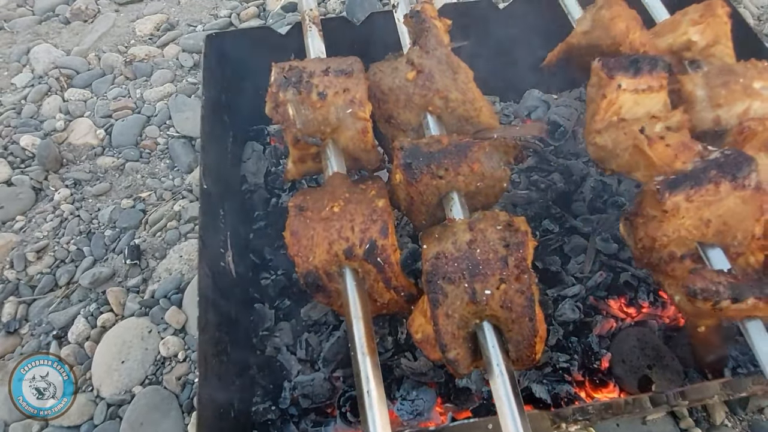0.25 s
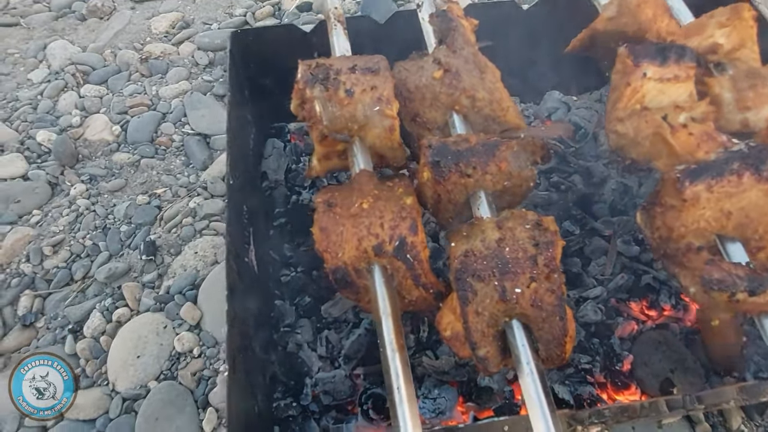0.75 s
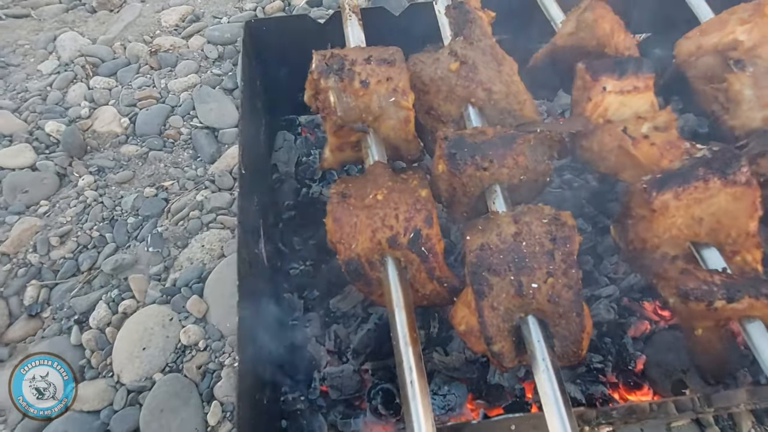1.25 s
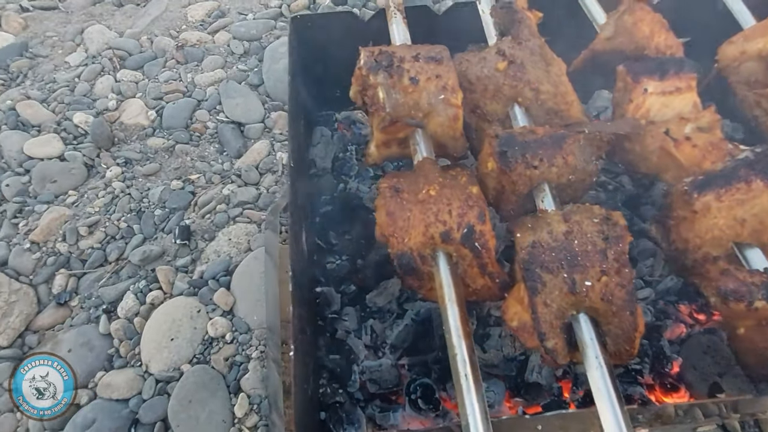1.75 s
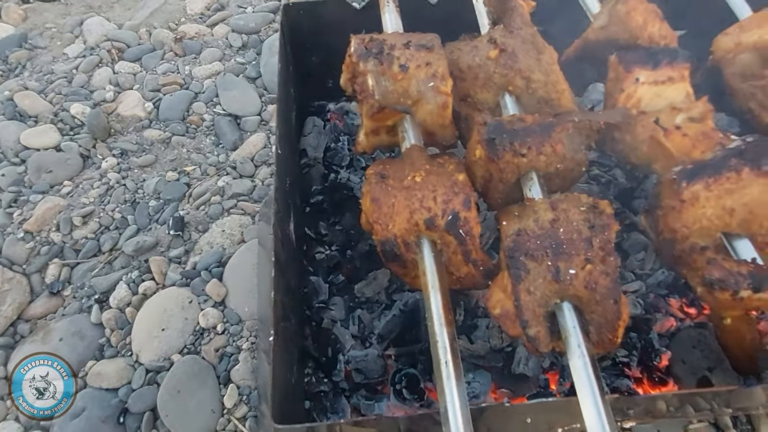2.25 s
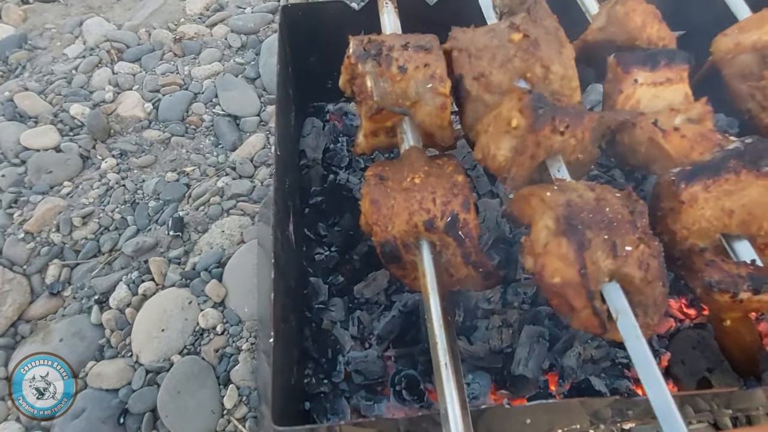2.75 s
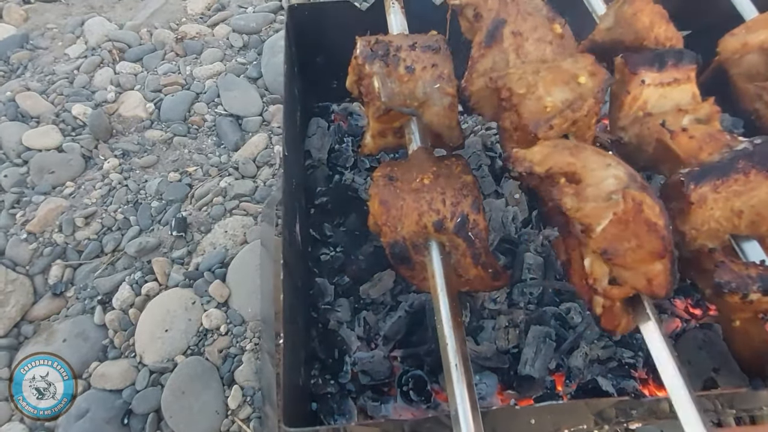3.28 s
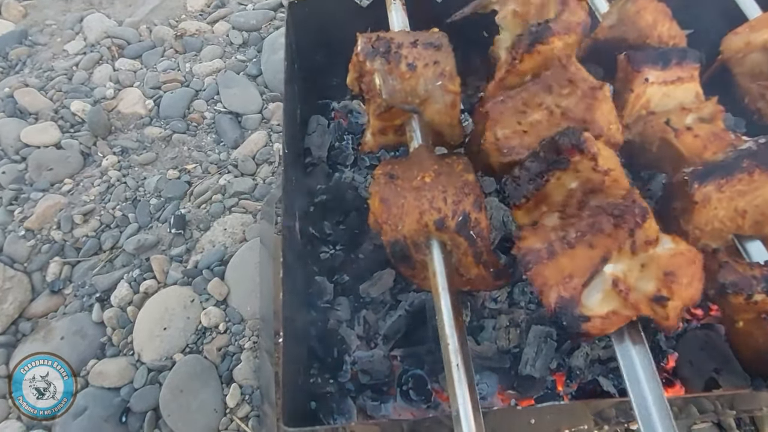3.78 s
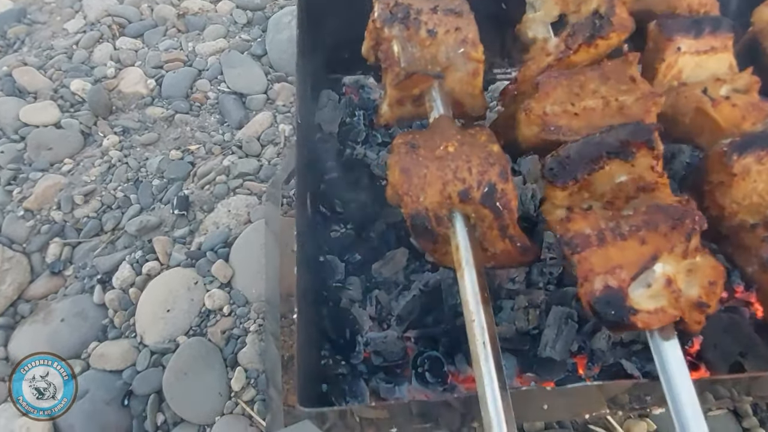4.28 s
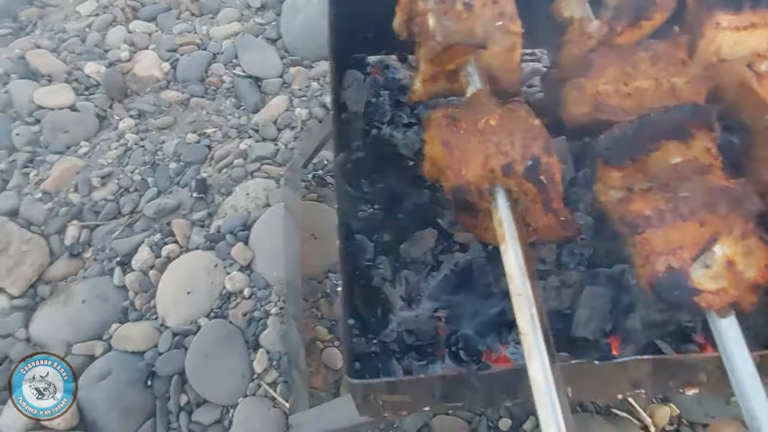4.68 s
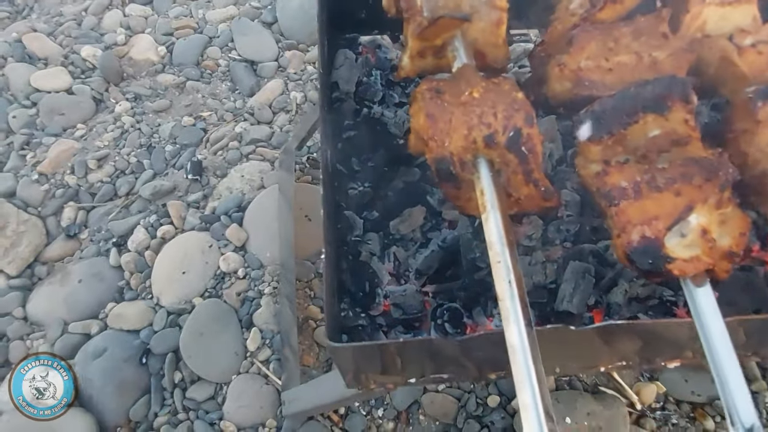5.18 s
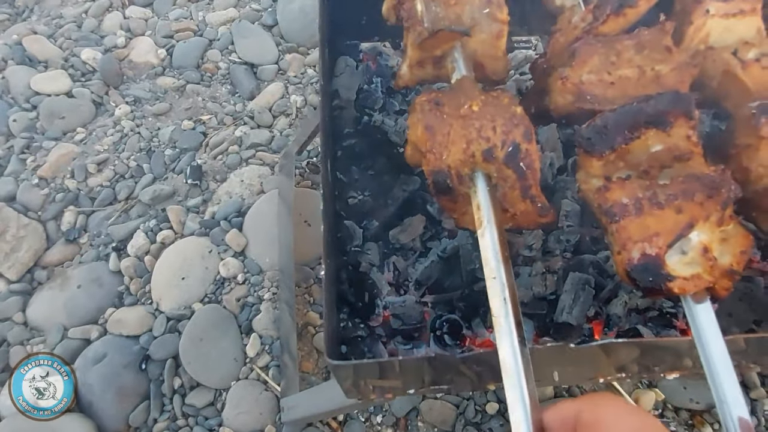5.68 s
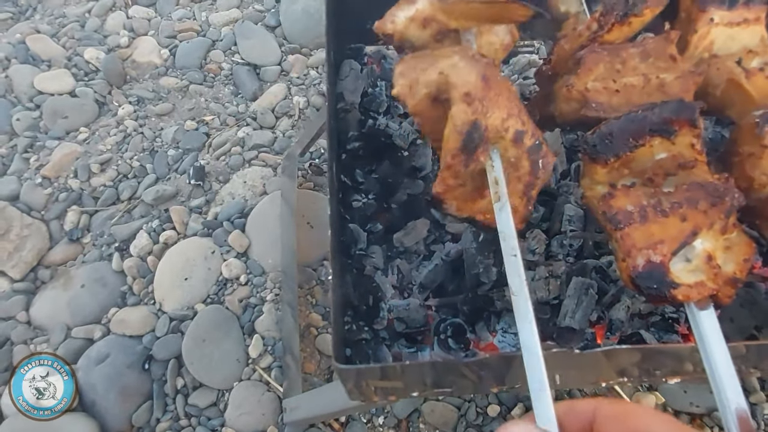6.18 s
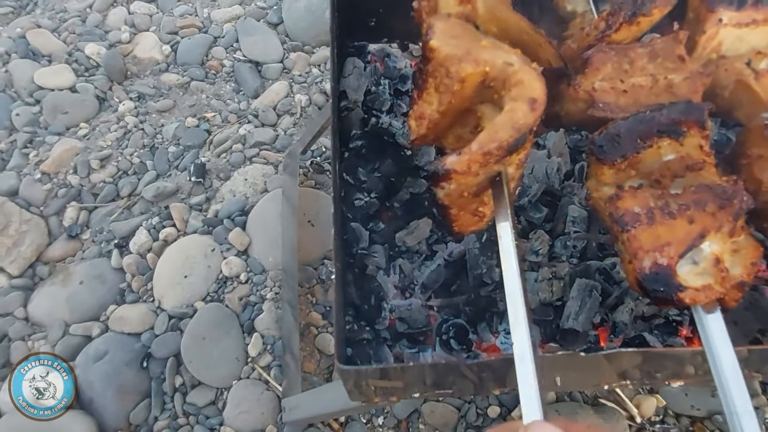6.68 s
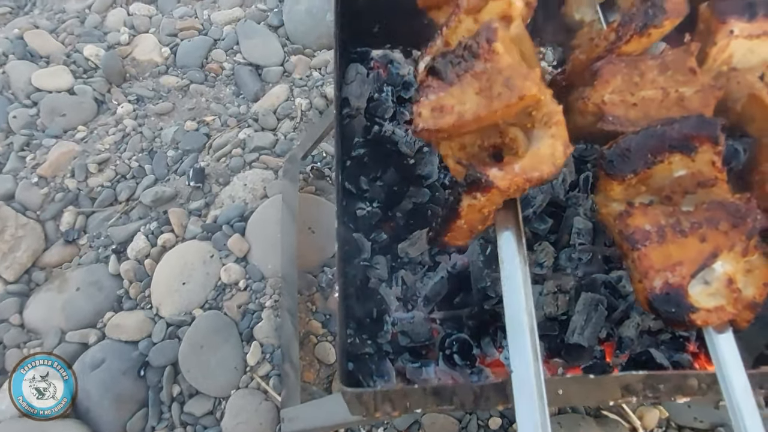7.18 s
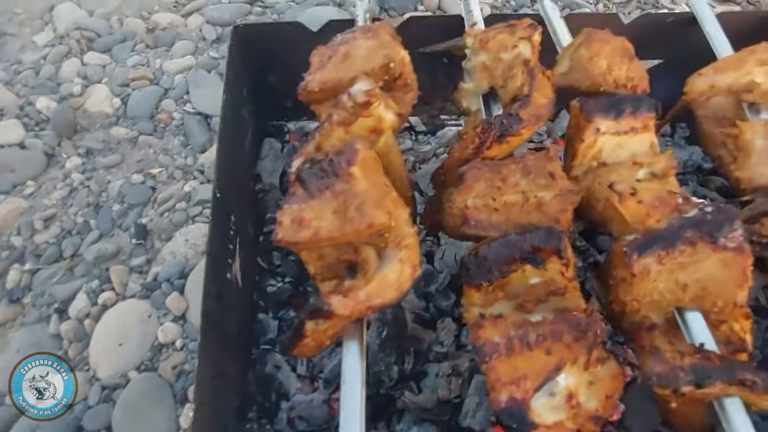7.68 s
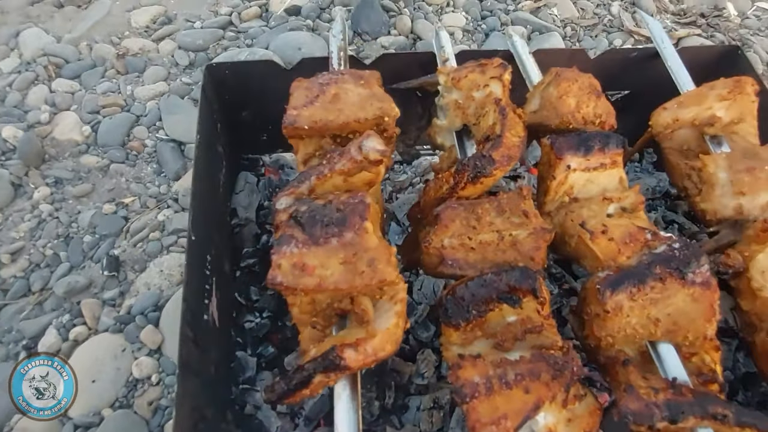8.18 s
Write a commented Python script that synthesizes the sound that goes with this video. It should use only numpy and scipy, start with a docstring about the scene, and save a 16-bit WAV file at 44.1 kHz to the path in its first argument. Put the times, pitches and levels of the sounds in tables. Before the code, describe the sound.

Skewered fish sizzles finely over charcoal with sharp snaps and spits, a steel skewer clacks into place, and a brief boiling hiss flares late.

```python
"""A pebble riverbank: skewered fish sizzles over charcoal in a sheet-steel trough, close to a hand-held phone.
The sizzle is thousands of tiny clicks, busier when the fat flares up; late on, one drop boils off in a hiss.
Each coal snap is one click through resonances; the skewer squeaks and rubs as filtered noise, then drops
into its notch and rings as a sum of dying sine tones. Handling bumps are short low noise.
Hot air, breeze on the microphone and the far river are noises with their own spectra and random wavering."""
import sys
import numpy as np
from scipy import signal
from scipy.fft import rfft, irfft, next_fast_len
from scipy.io import wavfile
from scipy.ndimage import uniform_filter1d

SR = 44100
rng = np.random.default_rng(int(sys.argv[2]) if len(sys.argv) > 2 else 0)


def transcribe(signal):
    """Save signal, clipped to [-1, 1], as a 16-bit WAV file at the path in sys.argv[1]."""
    frames = np.atleast_2d(signal).T
    limited = np.clip(frames, -1, 1)
    pcm = np.round(limited * 32767).astype(np.int16)
    wavfile.write(sys.argv[1], SR, pcm)


N = 372644  # length in samples
TOP_HZ = 15950  # nothing much is heard above this


def undb(db):
    """Turn decibels into a gain."""
    return 10 ** (np.asarray(db) / 20)


def unit(x):
    """Scale to an rms (average strength) of one."""
    return x / np.sqrt(np.mean(x ** 2))


def during(start, end, fade=0.012):
    """A window in time, in seconds, with soft edges."""
    t = np.arange(N) / SR
    return np.clip(np.minimum(t - start, end - t) / fade, 0, 1)


def colour(x, spectrum):
    """Shape a sound by a spectrum of (Hz, dB) points, then scale it to an rms of one."""
    hz, db = np.transpose(spectrum)
    size = next_fast_len(N)
    f = np.maximum(np.fft.rfftfreq(size, 1 / SR), 1)
    # below the first point the sound falls away
    below = np.minimum(f / hz[0], 1) ** 2
    gain = undb(np.interp(np.log(f), np.log(hz), db)) * below * (f < TOP_HZ)
    return unit(irfft(rfft(x, size) * gain, size)[..., :N])


def band(x, hz, width):
    """A resonance, width in Hz, with a gain of one at its centre."""
    hz = min(hz, TOP_HZ)
    quality = hz / min(width, TOP_HZ)
    return signal.lfilter(*signal.iirpeak(hz, quality, fs=SR), x)


def above(x, hz, order=2):
    """Keep what lies above a pitch (high-pass)."""
    return signal.sosfilt(signal.butter(order, min(hz, TOP_HZ), "high", fs=SR, output="sos"), x)


def sides(pan_db):
    """Left and right gains of constant power, from left minus right in dB."""
    gains = undb(np.array([pan_db, -pan_db]) / 2).reshape(2, -1)
    return gains / np.sqrt(np.mean(gains ** 2, axis=0))


def ports(x, lag_s):
    """One microphone port hears a near sound later; a positive lag means that the left one is late."""
    lag = round(lag_s * SR)
    left = np.roll(x[0], max(lag, 0))
    right = np.roll(x[1], max(-lag, 0))
    return np.array([left, right])


def noise(likeness, size=N):
    """Left and right noise: likeness 1 is the same on both sides, 0 is unrelated."""
    c = np.clip(likeness, -1, 1)
    mid, side = rng.standard_normal((2, size)) * np.sqrt([[(1 + c) / 2], [(1 - c) / 2]])
    return np.array([mid + side, mid - side])


def walk(rate):
    """Slow chance: random levels, each held 1 / rate seconds, smoothed twice to an rms of one."""
    hold = int(SR / rate)
    steps = np.repeat(rng.standard_normal(N // hold + 1), hold)[:N]
    return unit(uniform_filter1d(uniform_filter1d(steps, hold), hold))


def swells(rows, rise_s, fall_s):
    """Summed power of (start s, length s, dB) swells that rise, hold and die away; a fourth column pans each."""
    t = np.arange(N) / SR
    coarse = t[::64]  # slow shapes need few points
    power = 0
    for start, length, db, *pan in rows:
        rise = np.clip((coarse - start) / rise_s, 0, 1)
        fall = np.exp(-np.clip((coarse - start - length) / fall_s, 0, 20))
        power = power + (undb(db) * rise * fall * sides(pan[0] if pan else 0)) ** 2
    return np.array([np.interp(t, coarse, p) for p in power])


def add(out, s, sound):
    """Mix a short sound in at a time in seconds."""
    i = int(s * SR)
    out[:, i:i + sound.shape[1]] += sound[:, :N - i]


def peak(x, db):
    """Set the level of the loudest millisecond."""
    power = uniform_filter1d(np.mean(x ** 2, axis=0), size=44)
    return x * undb(db) / np.sqrt(power.max())


def crack(scatter_db, scatter_s, tail_db, tail_s):
    """One sharp click, its scatter among the coals, and a faint tail from trough and pebbles."""
    t = np.arange(SR // 8) / SR
    scatter = undb(scatter_db) * np.exp(-t / scatter_s)
    tail = undb(tail_db) * np.exp(-t / tail_s)
    click = (scatter + tail) * noise(0.13, size=len(t))
    click[:, 0] += 1
    return click


def bubbles(rate, spread_db, width_db, count=6):
    """Bubbles burst at a rate per second in several spots: very many small ones and a few large."""
    out = np.zeros((2, N))
    # bubbles come in flurries
    busy = undb(2.2 * walk(12))
    for place in np.linspace(-1, 1, count):
        at = np.flatnonzero(rng.random(N) < busy * rate / count / SR)
        size = undb(spread_db * np.minimum(rng.exponential(size=len(at)), 5))
        train = np.zeros((1, N))
        train[0, at] = size * rng.choice([-1, 1], len(at))
        # every burst in a spot sounds through the same path to the two ports
        burst = crack(scatter_db=-11.5, scatter_s=0.0013, tail_db=-25.0, tail_s=0.011)
        path = ports(burst, .00022 * place) * sides(-width_db * place)
        out += signal.oaconvolve(train, path, axes=1)[:, :N]
    return unit(out)


def sizzle():
    """Fat fries on the fish: bursting bubbles make a fine fizz and separate ticks; embers crackle lower."""
    # The spectrum of the frying fat. Each row: pitch in Hz, relative level in dB.
    fat_spectrum = [(600, -33), (1200, -10.5), (2000, -10.5), (3200, -7), (4600, -4.5), (7000, -6.5),
                    (9500, -3.5), (12500, 2), (16000, -3.5)]
    # The fat flares up, most when a skewer is turned.
    # Each row: start in seconds, length in seconds, level in dB before mixing, left minus right in dB.
    flares = [(0, .18, -61, 1), (1.16, .09, -62, -12), (1.96, .1, -66, -8), (3.17, .73, -58, 5),
              (3.38, .53, -54, -1), (3.65, .25, -56, 0), (4.0, .55, -59, 2), (4.2, .13, -55.5, 3),
              (5.78, .17, -64, 3), (6.5, .15, -62, 13), (6.9, .08, -56.5, -6), (7.03, .13, -60.5, 6),
              (8.13, .08, -65, 12)]
    # The embers crackle harder for a while. Each row: start in seconds, length in seconds, level in dB.
    stirs = [(.35, 0.19, -66.5), (1.15, 0.083, -66), (1.7, 0.36, -63), (2.4, 0.27, -69),
             (3.17, 0.79, -58.5), (3.75, 0.53, -58.5), (5.25, 0.53, -67), (7.4, 0.53, -66),
             (8.08, .15, -65.5)]
    fry_db, fry_pan_db, ember_db = -61.5, 1.2, -73  # steady levels, before flares and stirs
    fry_power = (undb(fry_db) * sides(fry_pan_db)) ** 2 + swells(flares, rise_s=.05, fall_s=.13)
    ember_power = undb(ember_db) ** 2 + swells(stirs, rise_s=0.035, fall_s=0.11)
    level_db = 10 * np.log10(fry_power.mean(axis=0))
    # the hotter the fat, the more bubbles burst
    heat = undb(.7 * (level_db - level_db.mean()))
    fizz = colour(bubbles(2500 * heat, spread_db=3.0, width_db=6), fat_spectrum)
    fizz = fizz * undb(2.0 + 2.0 * walk(22))
    ticks = colour(bubbles(170, spread_db=5.0, width_db=1.5), fat_spectrum) * undb(-1.5)
    ember_spectrum = [(700, -18), (1300, -9), (1900, -3), (3000, -5.5), (4600, -8.0), (8000, -16.0)]
    embers = colour(bubbles(200, spread_db=3.0, width_db=-3.0), ember_spectrum)
    # more bubbles are already louder, so the fizz is evened out before its level is set
    frying = (fizz / np.sqrt(heat) + ticks) * np.sqrt(fry_power)
    return frying + embers * np.sqrt(ember_power)


def air():
    """Hot air flutters over the bed in puffs; the breeze buffets each port almost separately."""
    # The spectrum of the hot air. Each row: pitch in Hz, relative level in dB.
    hot_air_spectrum = [(100, -8), (200, -4), (310, 2.5), (450, -2.5), (650, -3.5), (850, -13),
                        (1200, -16.5), (2000, -16.5), (4000, -23.5)]
    # The low spectrum of wind on the microphone. Each row: pitch in Hz, relative level in dB.
    wind_spectrum = [(24, -28), (42, 0), (70, -0.5), (110, -4.5), (165, -17.5), (250, -28), (500, -38),
                     (1000, -66)]
    # Puffs of hot air over the coals.
    # Each row: start in seconds, length in seconds, level in dB before the flutter.
    puffs = [(0, 0.021, -58.5), (.23, 0.071, -58.5), (.41, 0.26, -66.5), (.89, 0.067, -66.5),
             (1.15, 0.12, -58.5), (1.35, .12, -57), (1.74, 0.33, -71), (2.24, 0.13, -67), (3.3, 0.62, -65),
             (3.93, 0.054, -60.5), (4.3, 0.11, -65.5), (4.58, 0.16, -63), (5.33, 0.35, -64.5),
             (6.43, .09, -70.5), (6.78, 0.12, -64.5), (7.45, 0.15, -66), (7.72, .19, -62.5),
             (8.08, 0.17, -60)]
    # Gusts on the microphone.
    # Each row: start in seconds, length in seconds, level in dB before wavering, left minus right in dB.
    gusts = [(.67, 0.35, -62.5, 15), (1.38, 0.27, -62.5, 7), (1.85, 0.37, -63.5, 7), (2.81, 0.063, -56, 20),
             (3.22, 1.15, -63.5, 17), (3.68, 0.41, -60, 19), (6.31, 0.065, -50, 24), (6.41, .11, -47, 28),
             (6.77, 0.089, -42, 30), (7.08, 0.061, -55, 21), (7.37, 0.12, -53, 22), (7.78, .11, -56, -6),
             (8.03, 0.025, -47, 27), (8.15, 0.12, -47.5, -19)]
    hot_air_db, breeze_db, breeze_pan_db = -73.5, -68, 8  # steady levels, before puffs and gusts
    draught = undb(hot_air_db) ** 2 + swells(puffs, rise_s=0.016, fall_s=0.055)
    breeze = (undb(breeze_db) * sides(breeze_pan_db)) ** 2
    buffet = breeze + swells(gusts, rise_s=0.013, fall_s=0.035)
    flutter = colour(noise(0.61), hot_air_spectrum) * np.sqrt(draught) * undb(0.5 + 2.7 * walk(30))
    wind = colour(noise(0.068), wind_spectrum) * np.sqrt(buffet) * undb(1.54 * walk(15))
    return flutter + wind


def river():
    """The smooth, distant rush of water: steady noise that wavers very little."""
    # The spectrum of the far water. Each row: pitch in Hz, relative level in dB.
    water_spectrum = [(24, -35), (40, -13), (87, -9), (133, 2), (194, -4), (290, -2.5), (630, -18),
                      (918, -15.5), (1370, -26.5), (1850, -6), (2260, -16), (4930, -12.5), (6820, -14),
                      (12500, -9.5), (16000, -14)]
    return colour(noise(0.072), water_spectrum) * undb(-63.0 + 0.72 * walk(3.12))


def snaps():
    """Coals split and fat spits, and the skewer knocks once; each crack has its own brightness and place."""
    # Snaps of coal and spitting fat; the row at 3.4988 s is a dull knock of the skewer on the trough. # Each
    # row: time in seconds, level in dB before a small lift, brightness in Hz (sets the filters), # level of the
    # low body against the bright part in dB, left minus right in dB before narrowing.
    cracks = [(0.1347, -44, 8800, -6, 2.5), (.1649, -43.5, 11300, -22, 9), (0.2367, -12, 8900, -29, -5.5),
              (0.2442, -34.5, 6950, -6, -3), (0.3014, -32, 7800, -14.5, -1.5), (.379, -39.5, 10890, -26, 6),
              (0.8736, -48.5, 2580, 4, 1), (0.896, -52, 4000, 4, -0.5), (1.157, -19.5, 7600, -18.5, -7),
              (1.2545, -40, 7700, -10, -3), (1.2722, -30, 5900, -16, -3), (1.4027, -44, 4550, -18, -8),
              (1.5168, -45.5, 3200, 2, -1.5), (1.984, -41, 10400, -28, -8), (2.0412, -39, 10800, -12, -6.5),
              (2.069, -48, 5900, 5, -1), (2.9958, -40.5, 9100, -18, 2), (3.1622, -36.5, 9800, -18.5, 1.5),
              (3.2297, -32.5, 8400, -6, -1), (3.2402, -36.5, 10300, -24, 8), (3.2895, -37, 9500, -15, 2),
              (3.321, -36, 11000, -16, 3), (3.403, -41, 10000, -9, 1), (3.4352, -35, 8600, -11, 4),
              (3.4988, -35, 2200, 16, 2), (3.57, -40, 9700, -21, 0), (3.6726, -36.5, 7900, -6.5, 2),
              (3.711, -30.5, 11600, -12.5, 4.5), (3.807, -40, 10000, -16, 9.5),
              (3.8546, -27.5, 10200, -6, 7), (4.182, -33, 11100, -14.5, -6.5),
              (4.27, -31.5, 12600, -23, -0.5), (4.3004, -33, 10600, -25, -6.5),
              (4.5135, -37.5, 10000, -32, 0.5), (4.5904, -34.5, 8050, -19, 1),
              (4.6937, -41.5, 4270, -6, -1.5), (4.783, -37, 7700, -7.5, 1), (4.992, -40.5, 9800, -13, 2.5),
              (5.3658, -39, 10600, -20, 0.5), (5.387, -27, 12200, -8, -3.5), (5.7815, -41, 9200, -14, -1.5),
              (5.8443, -42.5, 10800, -12, -1.5), (5.858, -43, 10000, -11, 0),
              (5.9567, -37, 10100, -39, 2.5), (6.038, -45, 8500, -8, 0), (6.078, -48, 3500, 7, -1.5),
              (6.1003, -48, 2300, 9, 4), (6.4923, -38, 10100, -13.5, 3.5), (6.564, -33.5, 9100, -17, 5.5),
              (6.6063, -42, 9750, -11, 7), (6.8385, -26, 8150, -9, -8.5), (6.937, -32, 11300, -23, -3.5),
              (6.949, -28.5, 11500, -19, -8), (6.9896, -38, 12800, -27, 9), (7.079, -34, 11100, -26, 6),
              (7.089, -21.5, 12700, -25, 2), (7.2565, -45, 5600, -11, 14.5), (7.7262, -37, 11900, -26, 10),
              (8.1848, -37, 10700, -19, 8.5)]
    # Resonances of the coal bed that colour each snap.
    # Each row: pitch in Hz, width in Hz, level in dB for a snap deep in the bed.
    bed_resonances = [(2620, 1200, 7), (4670, 590, 7.5), (5740, 140, -7), (7800, 210, -29)]
    out = np.zeros((2, N))
    for s, db, hz, low_db, pan_db in cracks:
        # dull cracks come from within the bed and ring it, bright spits from the skin stay dry
        depth = 1 / (1 + (hz / 9500) ** 6)
        click = crack(scatter_db=-18 + 10 * depth, scatter_s=0.0016, tail_db=-33.5 + 9.4 * depth, tail_s=0.0083)
        bright = above(band(click, 1.154 * hz, 0.84 * hz), 0.46 * hz)
        bed = sum(undb(gain_db) * band(bright, f, width) for f, width, gain_db in bed_resonances)
        bright = bright + depth * bed
        # the lows linger longer between the steel walls
        hollow = crack(scatter_db=-16.5, scatter_s=0.0031, tail_db=-33.0 + 10 * depth, tail_s=0.024)
        body = above(band(hollow, 1960, 1670), 300)
        sound = peak(bright, 0) + peak(body, low_db)
        sound = ports(sound, -.00003 * pan_db) * sides(0.74 * pan_db)
        add(out, s - .0002, peak(sound, db + .5))
    return out


def skewer():
    """The flat steel skewer squeaks, slides on the rim and drops into its notch, where its tones ring."""
    # A faint, grating squeak of the skewer.
    # Each row: start in seconds, end in seconds, pitch in Hz, level in dB.
    squeaks = [(0.397, 0.538, 742, -60), (0.42, 0.56, 1480, -66.5), (0.38, 0.584, 2150, -66.5)]
    # The skewer slips twice before it drops.
    # Each row: start in seconds, length in seconds, level in dB before a quick wavering.
    slips = [(3.853, 0.033, -51), (3.899, 0.031, -37)]
    # The skewer knocks against the trough.
    # Each row: time in seconds, level in dB, hardness of contact in Hz (higher is brighter).
    knocks = [(3.500, -44, 1200), (3.9229, -14.5, 13500), (3.930, -46.5, 1500), (3.934, -39, 2000),
              (4.324, -44.5, 1810)]
    # Ringing tones of the skewer on the trough.
    # Each row: pitch in Hz, relative level in dB, time in seconds to die away by 60 dB.
    steel_tones = [(583, -22.5, 0.26), (834, -20, .05), (1600, -18, 0.083), (2550, -14.5, 0.12),
                   (2800, -28, 0.073), (4210, 8.5, 0.023), (5850, 1, 0.03), (7240, 6, 0.017),
                   (8030, 5, 0.02), (10900, 3, 0.019), (12800, -13, 0.0072)]
    t = np.arange(SR // 5) / SR
    ring = 0
    for hz, db, t60 in steel_tones:
        ring = ring + undb(db) * np.sin(2 * np.pi * hz * t) * np.exp(-np.log(1000) * t / t60)
    slipping = np.sqrt(swells(slips, rise_s=0.0045, fall_s=0.017))
    rub_spectrum = [(150, -9.5), (450, 3), (850, 3), (1200, -9),
                    (1600, -3.5), (4200, -8), (8000, -10.0), (16000, -10)]
    rubbing = colour(noise(0.46), rub_spectrum)
    out = rubbing * slipping * undb(2 * walk(200))
    for s, db, hard_hz in knocks:
        # the edge chatters briefly as it lands
        contact = crack(scatter_db=-0.5, scatter_s=0.0028, tail_db=-25, tail_s=0.0087)
        # both ports hear the same ringing steel
        blow = above(contact + undb(-5.5) * ring[:contact.shape[1]], 480)
        # a softer contact loses treble
        softened = signal.lfilter(*signal.butter(1, min(hard_hz, TOP_HZ), fs=SR), blow)
        add(out, s, peak(ports(softened, 0.00002), db))
    for start, end, hz, db in squeaks:
        grating = unit(band(band(noise(0.67), hz, 110), hz, 160))
        out += grating * undb(db) * during(start, end, fade=0.033)
    return out


def bumps():
    """Handling makes soft, short knocks with little treble: brief noise through a low resonance."""
    # Dull bumps of handling.
    # Each row: time in seconds, level in dB before a lift, pitch in Hz, length in seconds.
    thuds = [(0.582, -56.5, 390, 0.026), (1.269, -47, 332, 0.027), (1.776, -61, 710, 0.052),
             (4.585, -51, 403, 0.058), (4.695, -57, 650, 0.039), (5.338, -55.5, 584, 0.035),
             (7.566, -55.5, 705, 0.038), (7.629, -60.5, 900, .03), (7.904, -61, 855, 0.045)]
    out = np.zeros((2, N))
    t = np.arange(SR // 4) / SR
    for s, db, hz, length in thuds:
        push = noise(0.82, size=len(t)) * np.sqrt(t) * np.exp(-3 * t / length)
        add(out, s, peak(band(band(push, hz, 260), hz, 260), db + 2.5))
    return out


def flash():
    """A drop of fat hits a glowing coal and boils off: a spitting hiss catches at once, swells and dies."""
    # The spectrum of the boiling drop. Each row: pitch in Hz, relative level in dB.
    boiling_spectrum = [(200, -30), (320, -23), (560, -1), (800, -2), (1000, -9), (1700, -0.5), (3100, -8),
                        (5300, 2.5), (6800, -0.5), (12500, 4), (16000, 5.5)]
    start_s, catch_s, swell_s, top_db = 6.75, 0.018, 0.089, -36
    swell_db_per_s, fade_db_per_s = 84, 135
    t = np.arange(N) / SR - start_s
    past_top = t - swell_s  # seconds since the loudest moment
    level_db = top_db + np.minimum(swell_db_per_s * past_top, -fade_db_per_s * past_top)
    spit = colour(bubbles(rate=2600, spread_db=3.5, width_db=0), boiling_spectrum)
    return spit * undb(level_db) * np.clip(t / catch_s, 0, 1) * sides(-3.5)


def scene():
    """Everything around the grill, added together."""
    return sizzle() + air() + river() + snaps() + skewer() + bumps() + flash()


def record(dry):
    """The phone cuts off the highest treble with a steep filter."""
    return signal.sosfilt(signal.ellip(10, .2, 70, TOP_HZ, fs=SR, output="sos"), dry)


dry = scene()
out = record(dry)
transcribe(out)
```